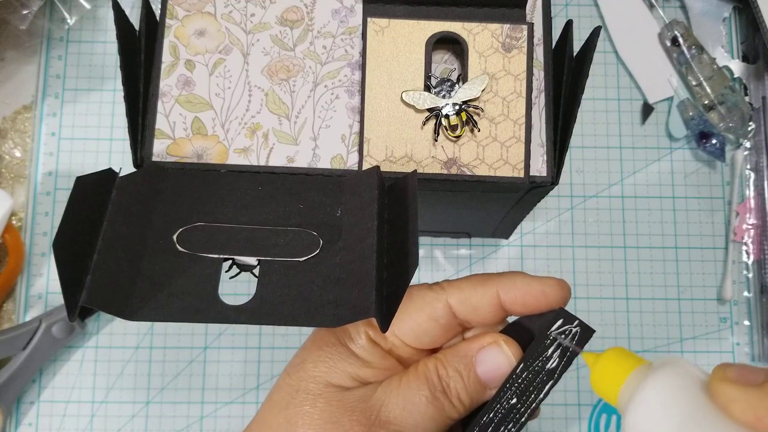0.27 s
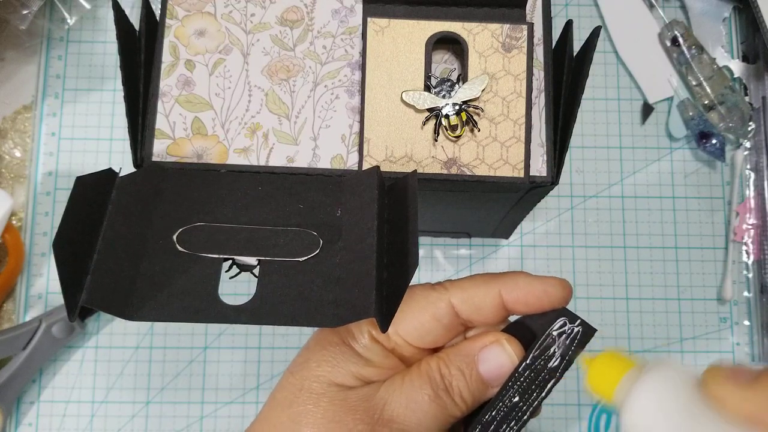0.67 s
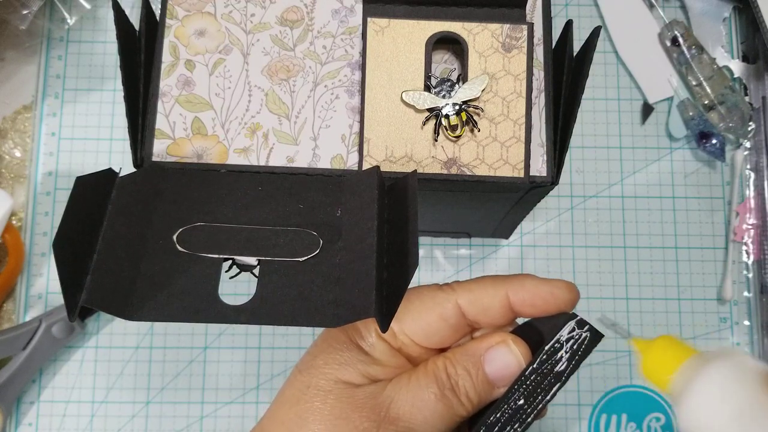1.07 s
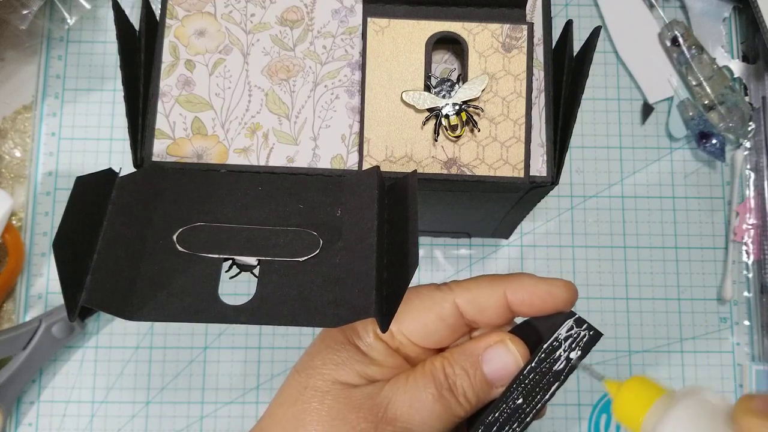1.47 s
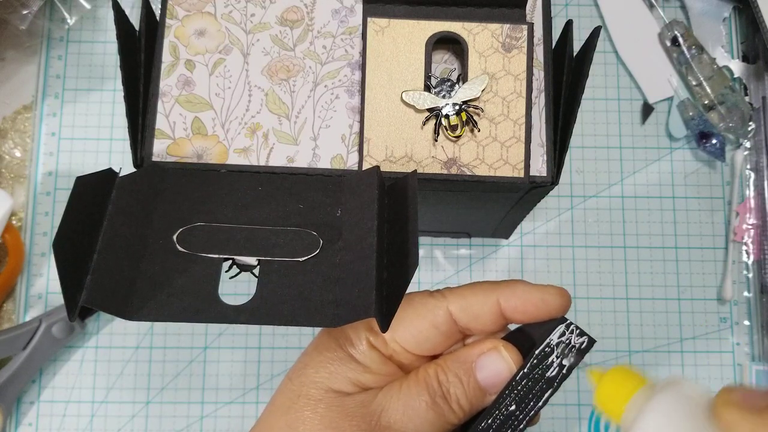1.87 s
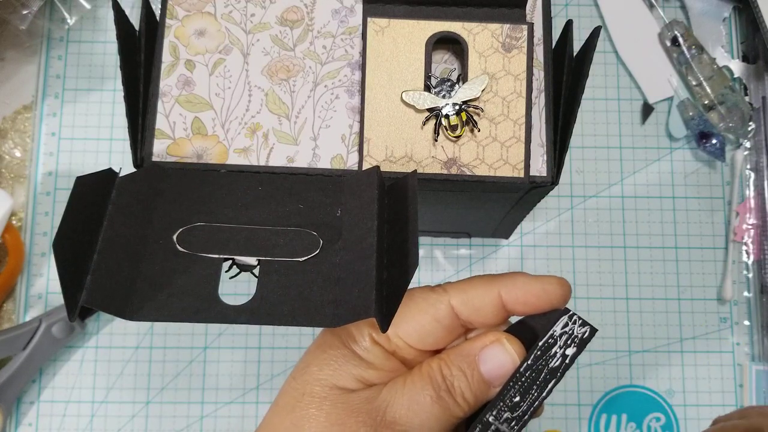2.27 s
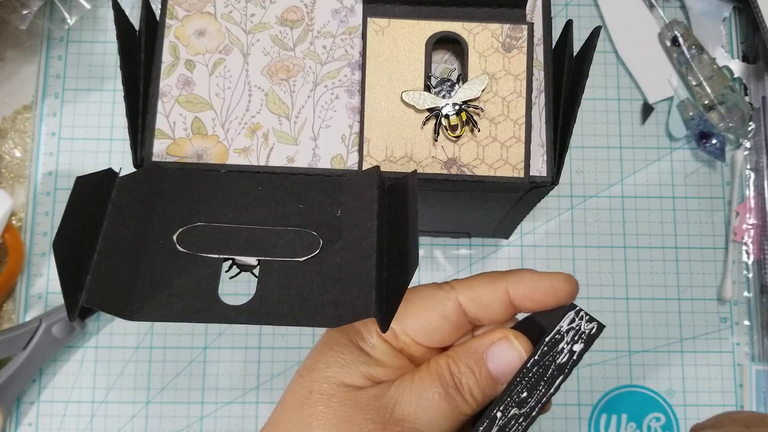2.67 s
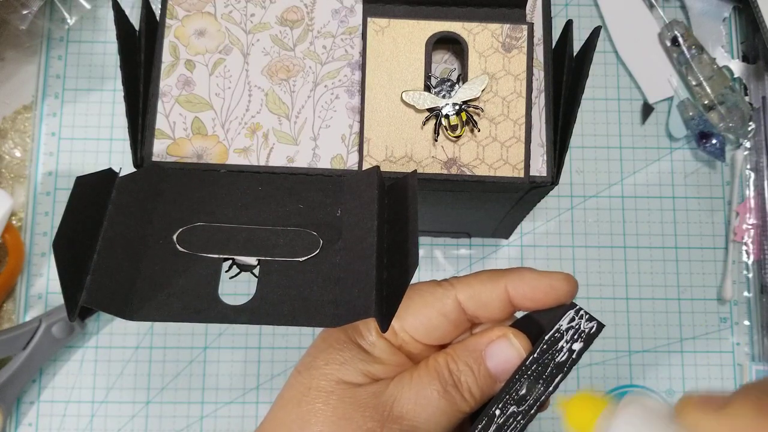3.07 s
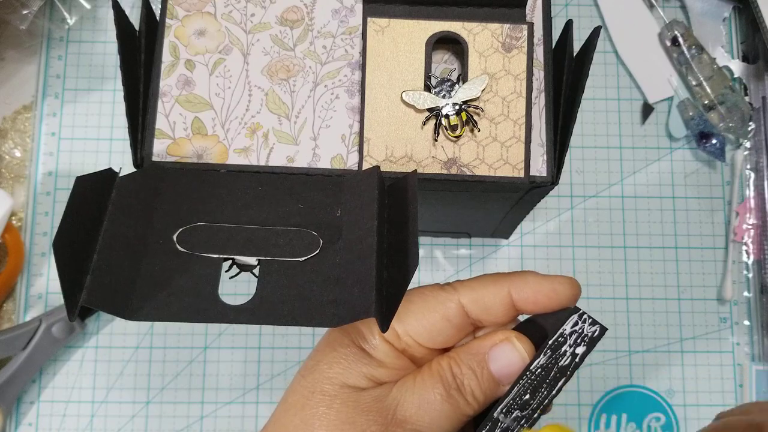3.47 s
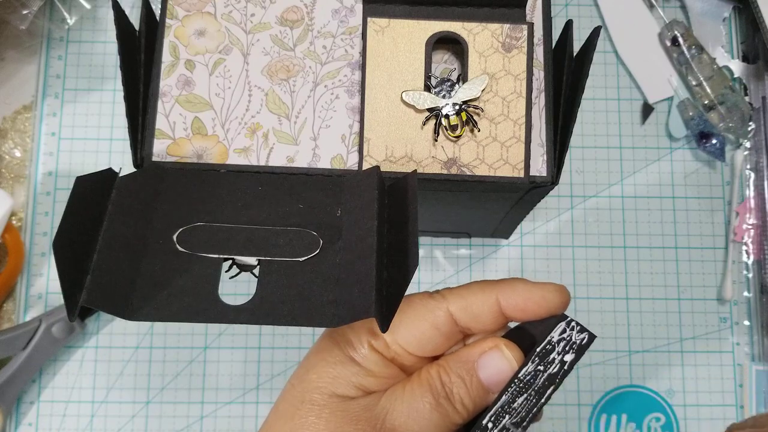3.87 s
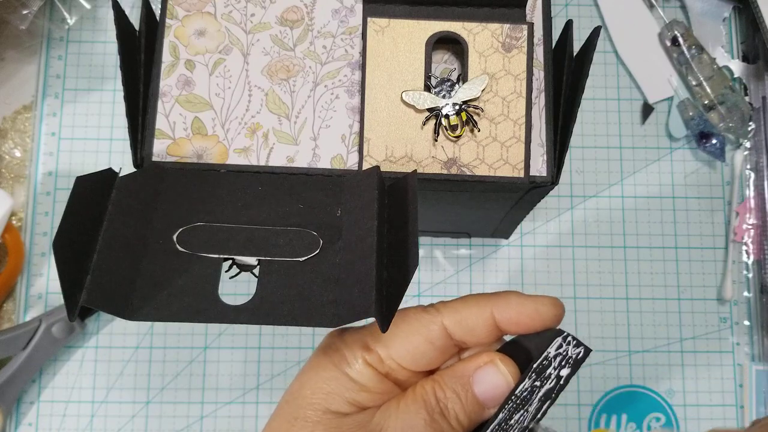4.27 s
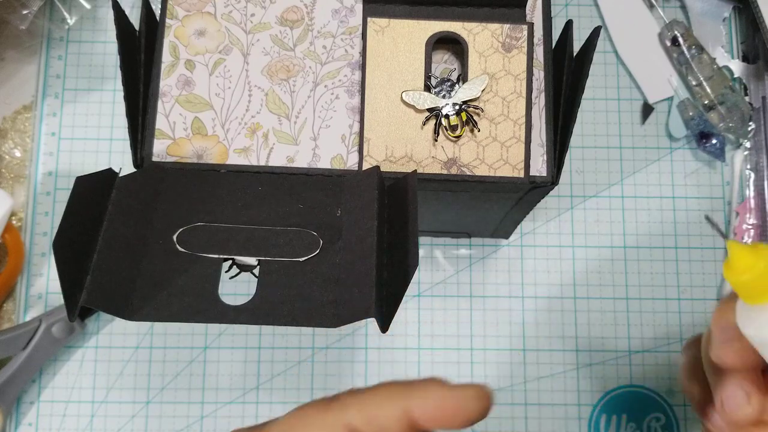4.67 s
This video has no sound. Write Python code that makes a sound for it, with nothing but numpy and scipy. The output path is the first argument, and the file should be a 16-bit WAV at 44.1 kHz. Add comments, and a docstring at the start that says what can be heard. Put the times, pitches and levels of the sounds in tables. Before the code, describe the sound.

A quiet, small-sounding room with steady low ventilation rumble and a thin hiss. Close by and slightly left, a fine glue nozzle scratches a cardstock strip. From 0 to 0.95 s come faint, quick, papery strokes with tiny crisp ticks, the clearest ticks near the start and around 0.5 s. From 1 to 1.9 s it is nearly still, with only very weak touches and one small tick near 1.7. Two light strokes around 1.95 lead to a distinct scrape at 2.15, then softer dabs and slow, faint drags until 2.9. From 3.05 to 4.15 s the scratching is busiest and loudest, short dry rasps in irregular bursts, strongest around 3.1, 3.7 and 3.97, with a tick near 3.9. Holding fingers creep dully beneath. The strokes die by 4.25; skin then brushes the strip in a soft, bright rustle peaking near 4.5, with weaker brushes around 4.73 and 4.86. The tabletop adds only a short tail.

```python
"""A quiet room with a work table: a thin glue needle scratches over a strip of cardstock in short strokes.
Fibres slip under the tip as clumped noise that rings the modes of needle, card and holding fingers.
Single fibres catch with a tick, the fingers creep, and at the end skin brushes the strip as a bright rustle.
The table top answers with a short tail; distant ventilation rumble and a thin hiss lie underneath."""
import sys
import numpy as np
from scipy import signal
from scipy.fft import rfft, irfft, next_fast_len
from scipy.io import wavfile
from scipy.ndimage import uniform_filter1d, map_coordinates

SR = 44100
rng = np.random.default_rng(int(sys.argv[2]) if len(sys.argv) > 2 else 0)


def digitize_waveform(pressure):
    """Quantize a signal to 16-bit integers and store it at the path in sys.argv[1].

    Rows of a 2-D input are taken as channels; values are limited to [-1, 1].
    """
    field = np.atleast_2d(pressure).T
    bounded = np.clip(field, -1, 1)
    quanta = np.round(bounded * 32767).astype(np.int16)
    wavfile.write(sys.argv[1], SR, quanta)


def attenuation_scalar(level_db):
    """Turn a level in dB into a linear amplitude multiplier (20 dB per decade)."""
    decades = np.asarray(level_db, float) / 20
    return 10 ** decades


N = 217477

# Levels of strokes, drags, ticks, grip and brush drive the sources, ahead of filters and trims.
# room rumble and hiss, relative colour: f/Hz, level per Hz/dB
RUMBLE_COLOUR = [(12, -71), (20, -13.5), (54, -21.5), (70, -14), (124, -1), (157, -6), (172, -6),
                 (198, -11.5), (220, -11), (257, -10.5), (365, -27.5), (380, -32.5), (450, -44),
                 (580, -112), (990, -120)]
AIR_COLOUR = [(260, -54), (450, -9.5), (633, -6), (852, -15.5), (918, -14), (1130, -14), (1870, -19.5),
              (5960, -21), (6420, -24.5), (15600, -21.5)]
# likeness of the room noise at left and right: f/Hz, correlation/1
ROOM_LIKENESS = [(60, 0.98), (180, 0.92), (550, 0.52), (1650, -0.4), (4970, -0.099), (15000, -0.15)]
# decay of the table-top tail: f/Hz, t60/s
TABLE_DECAY = [(500, 0.47), (4000, 0.038), (12000, 0.1)]
# strength of the table-top tail: f/Hz, level/dB
TABLE_LEVEL = [(500, -15), (4000, -5), (12000, -4)]
# skin brushing the strip: touch t/s, fastest t/s, skin level/dB
BRUSHES = [(4.366, 4.471, -60), (4.53, 4.58, -69), (4.65, 4.68, -71), (4.704, 4.728, -62.5),
           (4.805, 4.864, -61.5)]
# the rustle's body and its bright sheen, relative colour: f/Hz, level per Hz/dB
SKIN_COLOUR = [(1760, -21), (3000, -5.5), (3590, -16.5), (3920, -6.5), (4390, -9.5), (4880, -10),
               (7020, -12), (7730, -10), (9000, -16.5), (11700, -28), (19800, -120)]
SHEEN_COLOUR = [(5290, -22), (9000, -49), (10300, 1), (13700, 13), (15600, 7)]
# holding fingers: t/s, creep level/dB, body of a medium stroke relative to its level/dB
FINGER_GRIP = [(0, -68, -7), (0.3, -89, -4.5), (0.75, -67.5, -5.5), (0.98, -73.5, -4.5),
               (1.15, -81.5, -9.5), (1.75, -91, -15), (2.05, -70, -10), (2.45, -89, -17.5),
               (2.85, -77.5, -8), (3.25, -70, -9.5), (3.83, -65, -11), (4.06, -87, -9.5), (4.2, -73, -9.5),
               (4.32, -93, -8), (4.5, -78, -20), (4.93, -73.5, -12)]
# fibres that catch: t/s, nominal peak level/dB
CAUGHT_FIBRES = [(0.042, -28), (0.052, -28), (0.1106, -33.5), (0.2223, -37.5), (0.2872, -37),
                 (0.5117, -31.5), (0.5337, -31), (1.0505, -53), (1.0816, -47.5), (1.3417, -51),
                 (1.491, -48), (1.6157, -58), (1.6566, -54), (1.7352, -37.5), (1.921, -48), (2.0185, -31.5),
                 (2.3605, -43), (2.5476, -34), (2.5762, -33), (2.754, -40), (2.831, -34), (3.8827, -30),
                 (4.4667, -45)]
# quick strokes: centre t/s, half length/ms, level/dB, card over needle/dB, hiss relative to level/dB
QUICK_STROKES = [(0.007, 18, -58, -3, -21), (0.047, 28, -55.5, 8.5, -4.5), (0.146, 21, -50, 4.5, -8),
                 (0.386, 21, -69, 28, -19), (0.464, 14, -63.5, 20, -12), (0.528, 19, -57, 0.5, -36),
                 (0.593, 35.4, -59.5, 0.5, -5), (0.695, 21.4, -52, 3.5, -6), (0.81, 39, -67, -2, -1),
                 (0.884, 15, -59.5, -2, -6), (0.92, 21, -56.5, -4, -6), (1.387, 20, -58.5, -3.5, -15),
                 (1.501, 8.4, -67, -5, -30), (1.538, 6.7, -65, -4.5, -29), (1.74, 9.3, -66, -18, -29),
                 (1.799, 21, -70.5, -8, -28), (1.931, 8, -51, 14, -10), (1.988, 39.7, -50, 8, -8),
                 (2.145, 22.1, -37, 5, -19.5), (2.414, 9.7, -58, 6, -27), (2.463, 17, -46.5, -4.5, -20),
                 (2.758, 8.4, -44.5, 8, -37), (2.975, 19, -61.5, 8, -33), (3.052, 12.5, -42.5, 23, -15),
                 (3.099, 30.3, -35.5, 5.5, -19), (3.188, 3.5, -44.5, 6, -25), (3.225, 20.6, -39.5, 2, -14),
                 (3.345, 20.6, -44, -5, -12.5), (3.435, 17, -46.5, -5.5, -14), (3.566, 16.3, -43, 1, -11.5),
                 (3.601, 15, -47, 2.5, -20), (3.66, 18.4, -34.5, 6, -14.5), (3.756, 3.3, -35.5, 33, -20),
                 (3.781, 12.7, -35, 2.5, -16), (3.862, 17, -40, 2, -12), (3.969, 19.1, -36, 1, -17.5),
                 (4.052, 10.1, -41.5, 1, -9), (4.159, 14, -50.5, -2, -16), (4.23, 21, -63.5, 4, -9)]
# slow drags at an even speed: start t/s, end t/s, level/dB, card over needle/dB
SLOW_DRAGS = [(0.216, 0.291, -59, -3.5), (1.627, 1.703, -78.5, -14), (2.333, 2.377, -59, 24),
              (2.528, 2.654, -55.5, -1.5), (2.727, 2.871, -55.5, -4), (3.47, 3.53, -69, -6)]
# modes of the needle, the card, and the strip with fingers: f/Hz, width/Hz, relative level/dB
NEEDLE_MODES = [(2700, 250, -12), (3100, 200, -9), (3430, 90, 0), (3700, 250, -5)]
CARD_MODES = [(4424, 726, 7), (5095, 415, 9.5), (5340, 425, 9), (6750, 680, -1), (7350, 320, -0.5),
              (8050, 1100, -6), (8780, 260, -10.5)]
BODY_MODES = [(352, 104, -5.5), (618, 89, -0.5), (852, 195, 0.5), (1462, 346, -2.5), (2280, 600, -6.5)]
# fibre hiss, relative colour: f/Hz, level per Hz/dB
HISS_COLOUR = [(6000, -44), (8200, -0.5), (8900, -4.5), (10500, -5), (11300, -3), (12200, -4.5),
               (14000, -8), (15700, -0.5)]
# the work sits nearer the left port: f/Hz, left over right level/dB
LEFT_OVER_RIGHT = [(60, 3.5), (180, 7), (550, 0), (1650, 4.5), (4970, 4), (15000, 8.5)]
# phase by which the left port leads: f/Hz, lead/rad
LEFT_LEAD = [(500, 0.049), (3000, 0.86), (6000, 0.79), (15000, 0.97)]
# stereo width of the work: f/Hz, share of noise power independent at each port/1
PORT_SHARE = [(500, 0.067), (2000, 0.2), (6000, 0.2), (14000, 0.78)]


def unit(x):
    """Scales a signal to rms 1."""
    return x / np.sqrt(np.mean(x ** 2) + 1e-20)


def along(points, hz):
    """Reads a curve of (f/Hz, value) points on a log frequency axis."""
    f, value = np.transpose(points)
    return np.interp(np.log(hz + 1), np.log(f + 1), value)


def wobble(rate):
    """A smooth random curve through `rate` random knots a second."""
    knots = rng.standard_normal(int(N * rate / SR) + 4)
    return map_coordinates(knots, [np.arange(N) * rate / SR])


def filtered(x, response):
    """Multiplies the spectrum of x by a complex response of frequency."""
    size = next_fast_len(N + SR // 2)  # room for the ringing
    return irfft(rfft(x, size) * response(np.fft.rfftfreq(size, 1 / SR)), size)[..., :N]


def even(response):
    """Scales a response so that white noise keeps its level."""
    return lambda hz: response(hz) / np.sqrt(np.mean(np.abs(response(hz)) ** 2))


def resonant(modes):
    """A sum of damped resonances with alternating sign."""
    def response(hz):
        total = 0
        for k, (centre, width, db) in enumerate(modes):
            damping = 1j * hz * width
            total = total + (-1) ** k * attenuation_scalar(db) * damping / (centre ** 2 - hz ** 2 + damping)
        return total
    return even(response)


def coloured(spectrum):
    """A smooth noise colour without resonances."""
    return even(lambda hz: attenuation_scalar(along(spectrum, hz)))


def thin(response):
    """A thin part radiates little below its first mode; soft fibres damp what lies above its last."""
    def second_order(u):
        return 1 / (1 + 1.2j * u - u ** 2)

    def radiated(hz):
        low_cut = -(hz / 2300) ** 2 * second_order(hz / 2300)
        return response(hz) * low_cut * second_order(hz / 8500) ** 2
    return radiated


def slips(clump_db, grain_db, spike_db):
    """Fibres slip in clumps of tiny grains with rare spikes; rows: common, left only, right only."""
    spikes = np.clip(wobble(1500) - 1.2, 0, 1.4)
    density_db = clump_db * wobble(60) + grain_db * wobble(350) + spike_db * spikes
    return unit(rng.standard_normal((3, N)) * attenuation_scalar(density_db))


def shifting(x, patchy_db):
    """Random patches of time and frequency make the colour of the strokes swell and fade."""
    z = signal.stft(x, nperseg=256)[2]
    field = rng.standard_normal(z.shape[1:])
    field = uniform_filter1d(field, size=4, axis=0)  # smooth over frequency
    field = uniform_filter1d(field, size=10, axis=1)  # smooth over time
    return signal.istft(z * attenuation_scalar(patchy_db * unit(field)), nperseg=256)[1][:, :N]


def rush(spectrum):
    """Diffuse stereo noise of rms 1: alike in the bass, nearly unrelated in the treble."""
    def mid_side(hz):
        angle = np.arccos(np.clip(along(ROOM_LIKENESS, hz), -1, 1)) / 2
        return attenuation_scalar(along(spectrum, hz)) * [np.cos(angle), np.sin(angle)]
    mid, side = filtered(rng.standard_normal((2, N)), mid_side)
    return unit(np.array([mid + side, mid - side]))


def room():
    """Distant ventilation rumble, slightly unsteady, over a thin steady hiss."""
    rumble_db = -57 + 0.54 * wobble(2.56)
    air_db = -71
    return attenuation_scalar(rumble_db) * rush(RUMBLE_COLOUR) + attenuation_scalar(air_db) * rush(AIR_COLOUR)


def table(x):
    """The table top answers with a short noise tail, drawn afresh every sixth of a second."""
    wet, step = np.zeros((2, N + SR)), SR // 6
    delay = 40  # samples
    for start in range(0, N, step):
        hz, t, z = signal.stft(rng.standard_normal((2, SR // 4)), SR, nperseg=128)
        decay = attenuation_scalar(-60 * t / along(TABLE_DECAY, hz)[:, None])
        tail = signal.istft(z * decay, SR, nperseg=128)[1]
        tail = tail / np.linalg.norm(tail[0])
        piece = signal.fftconvolve(x[None, start:start + step], tail, axes=1)
        wet[:, start + delay:][:, :piece.shape[1]] += piece
    return filtered(wet[:, :N], lambda hz: attenuation_scalar(along(TABLE_LEVEL, hz)))


def grip():
    """The holding fingers creep on the strip: dull friction noise whose level drifts."""
    t_s, creep_db, _ = np.transpose(FINGER_GRIP)
    level = attenuation_scalar(np.interp(np.arange(N) / SR, t_s, creep_db))
    return filtered(level * slips(clump_db=2.4, grain_db=2.8, spike_db=-0.5), resonant(BODY_MODES))


def brush():
    """Skin slides over the strip: a smoother, brighter rustle whose sheen swings wider than its level."""
    touch_db, fade_db_per_s = -9.5, 120  # start relative to the peak; fade after it
    sheen_db_at_peak, sheen_growth = -0.1, 1.6  # over skin at the loudest/dB; dB per dB of skin
    t = np.arange(N) / SR
    power = 0
    for touch, peak, db in BRUSHES:
        levels_db = [db + touch_db, db, db - fade_db_per_s]
        power = power + attenuation_scalar(np.interp(t, [touch, peak, peak + 1], levels_db, left=-150)) ** 2
    skin_db = 10 * np.log10(power)
    loudest_db = skin_db.max()
    sheen_db = loudest_db + sheen_db_at_peak + sheen_growth * (skin_db - loudest_db)
    drive = slips(clump_db=0.5, grain_db=0.5, spike_db=-9.0)
    skin = filtered(attenuation_scalar(skin_db) * drive, coloured(SKIN_COLOUR))
    return skin + filtered(attenuation_scalar(sheen_db) * drive, coloured(SHEEN_COLOUR))


def ticks():
    """A caught fibre snaps free at once, chatters for a moment and rings the same needle and card."""
    snaps, t = np.zeros(N + 200), np.arange(200) / SR
    for s, db in CAUGHT_FIBRES:
        chatter = 0.4 * attenuation_scalar(-60 * t / 0.0031) * rng.standard_normal(len(t))  # t60 3.1 ms
        snaps[round(s * SR):][:len(t)] += attenuation_scalar(db - 4.5) * ((t == 0) + chatter)
    rings = [(thin(resonant(NEEDLE_MODES)), .1), (thin(resonant(CARD_MODES)), .1),
             (resonant(BODY_MODES), -8), (coloured(HISS_COLOUR), -16)]  # ring, level/dB
    return sum(attenuation_scalar(db) * filtered(snaps[:N], ring) for ring, db in rings)


def strokes():
    """Strokes swell and trail off, drags hold their speed; fibre slips ring needle, card and fingers."""
    drag_edge_ms, drag_hiss_db = 7.5, -33  # soft start and stop; too slow to hiss much
    medium_db = -50  # drive level of a medium stroke
    body_growth, body_loss = 0.71, 0.39  # body rise per dB of level; fall per dB of card over needle
    rows = [(s, s, *row) for s, *row in QUICK_STROKES]
    rows += [(a, b, drag_edge_ms, db, card, drag_hiss_db) for a, b, db, card in SLOW_DRAGS]
    start, end, ms, db, card_db, hiss_db = np.transpose(rows)[..., None]

    # needle and card share the power of the stroke
    needle_db = db - 10 * np.log10(1 + attenuation_scalar(card_db) ** 2)
    grip_s, _, held_db = np.transpose(FINGER_GRIP)
    body_db = medium_db + np.interp(start, grip_s, held_db)
    body_db = body_db + body_growth * (db - medium_db) - body_loss * card_db

    t = np.arange(0, N + 32, 32) / SR  # a coarse clock is enough for the levels
    # the tip still drags as it turns
    trail = attenuation_scalar(-11.5) ** 2 * (t > end) * np.exp(-np.abs(t - end) / 0.018)
    drive = slips(clump_db=1.5, grain_db=3, spike_db=4.5)
    # fast slips at the start are bright, slow ones at the end dull: level/dB, ring, lag/half lengths
    parts = [(needle_db, thin(resonant(NEEDLE_MODES)), .15),
             (needle_db + card_db, thin(resonant(CARD_MODES)), -.1),
             (body_db, resonant(BODY_MODES), .25),
             (db + hiss_db, coloured(HISS_COLOUR), .05)]
    rub = 0
    for level_db, ring, lag in parts:
        late = t - lag * ms / 1000
        phase = (late - np.clip(late, start, end)) / ms * 1000  # zero while a drag holds
        hold = np.exp(-np.abs(phase) ** np.where(phase < 0, 2.4, 2))
        level = np.sqrt(np.sum(attenuation_scalar(level_db) ** 2 * (hold + trail), axis=0))
        rub = rub + filtered(np.interp(np.arange(N) / SR, t, level) * drive, ring)
    return shifting(rub, patchy_db=2.5)


def scene():
    """Places the work nearer the left port, widens its noise, and adds table tail and room."""
    rub = attenuation_scalar(-1.5) * (strokes() + brush() + grip())
    common = rub[0] + ticks()
    side = np.array([[.5], [-.5]])  # left, right

    def share(hz):
        return np.clip(along(PORT_SHARE, hz), 0, 1)

    def shared_path(hz):
        return np.sqrt(1 - share(hz)) * np.exp(1j * side * along(LEFT_LEAD, hz))

    direct = filtered(common, shared_path)
    direct = direct + filtered(rub[1:], lambda hz: np.sqrt(share(hz)))
    work = filtered(direct + table(common), lambda hz: attenuation_scalar(side * along(LEFT_OVER_RIGHT, hz)))
    return work + room()


def roll_off(x):
    """The treble ends steeply here."""
    return signal.sosfilt(signal.butter(12, 15800, fs=SR, output="sos"), x)


def record(dry):
    """Delivers the finished mix."""
    return roll_off(dry)


dry = scene()
out = record(dry)
digitize_waveform(out)
```